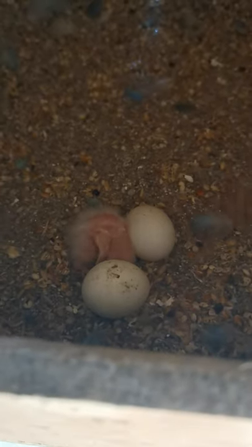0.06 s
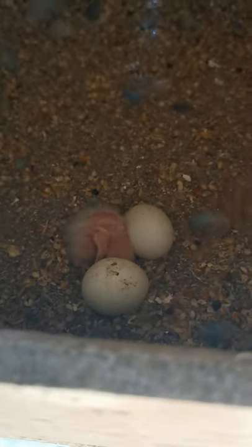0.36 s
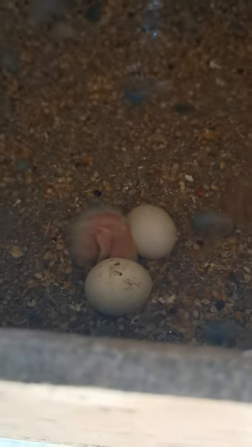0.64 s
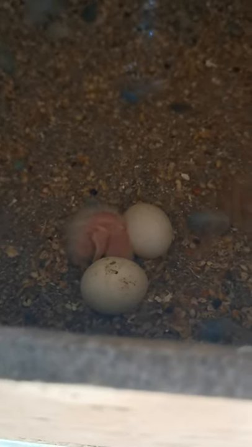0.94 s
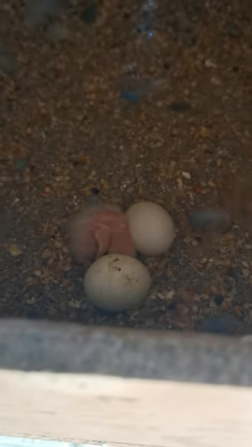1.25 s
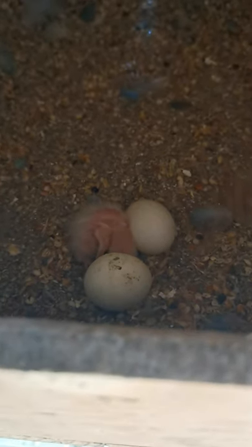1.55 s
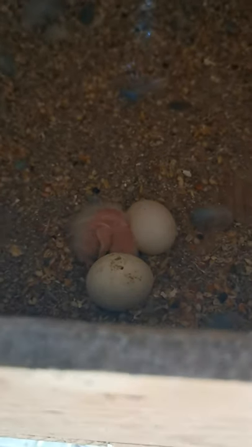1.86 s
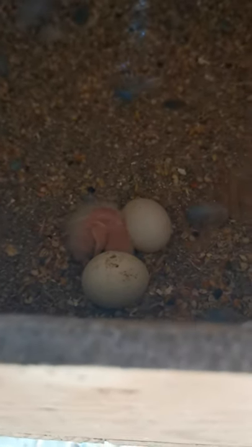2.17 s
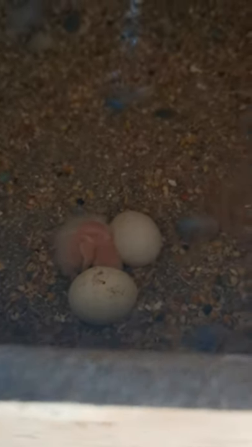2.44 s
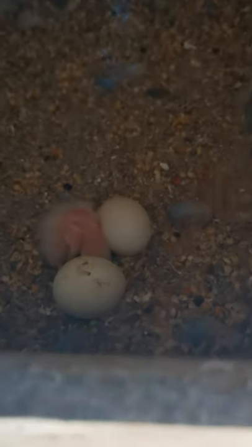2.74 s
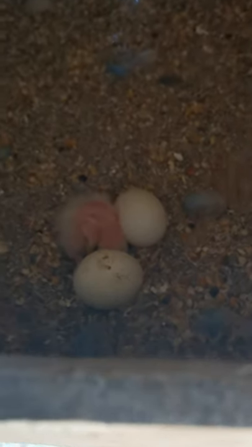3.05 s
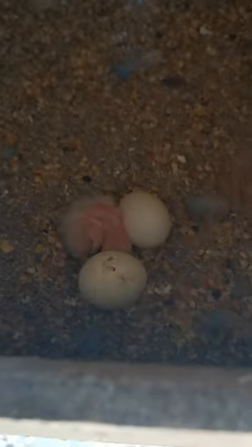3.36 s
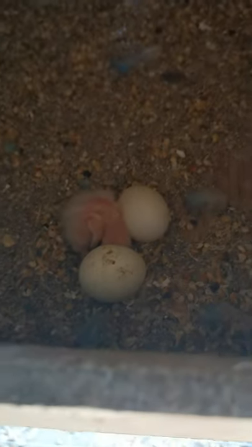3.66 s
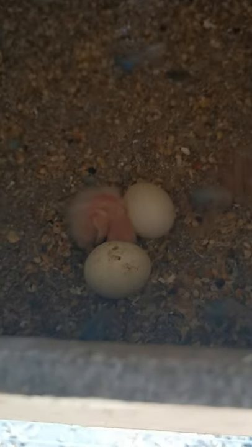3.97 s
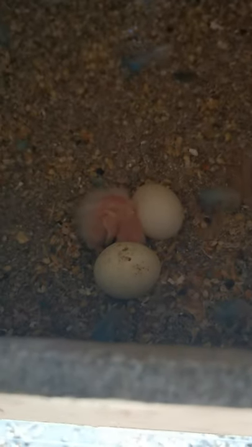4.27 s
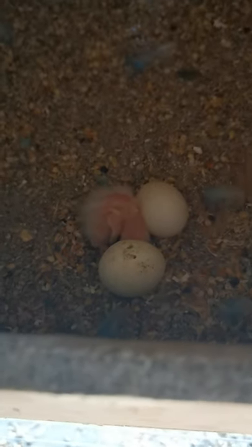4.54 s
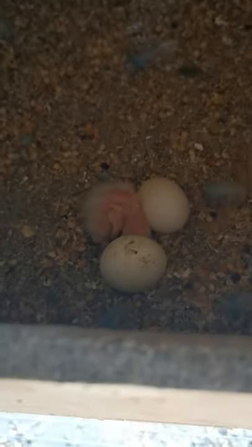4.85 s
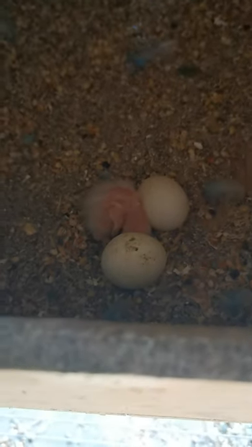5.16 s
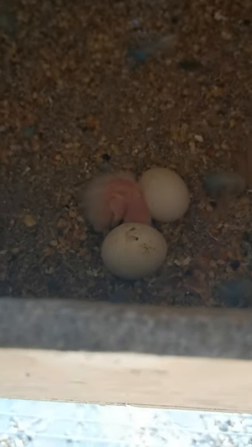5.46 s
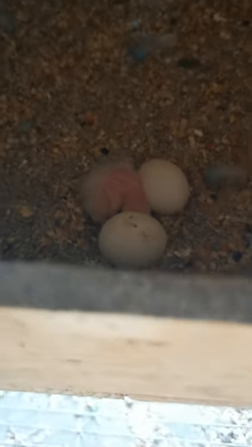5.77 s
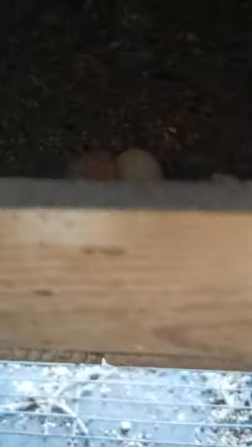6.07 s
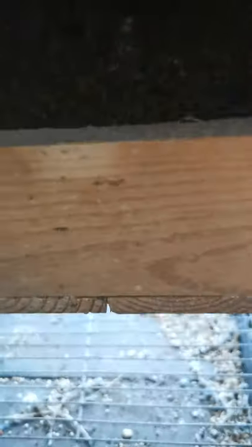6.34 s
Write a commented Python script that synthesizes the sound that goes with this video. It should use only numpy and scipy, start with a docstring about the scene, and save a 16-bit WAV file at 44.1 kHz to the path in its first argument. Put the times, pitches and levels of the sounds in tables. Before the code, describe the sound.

Small parrots chirp and screech harshly close by in a small room, over a faint low rumble.

```python
"""Lovebirds at a nest box

Lovebirds chirp and screech close to a phone held over a wooden nest box in a small room. A chirp
scratches on, holds a harmonic note and leaps to a whistle; a screech is the same voice chopped into
rough pulses. Something taps once on wood, faint low tones come and go, and another bird calls from
further off. A faint rumble comes up in the pauses as the phone's gain recovers."""
import sys
import numpy as np
from scipy import signal
from scipy.fft import rfft, irfft, next_fast_len
from scipy.io import wavfile
from scipy.ndimage import uniform_filter1d, minimum_filter1d

SR = 44100
rng = np.random.default_rng(int(sys.argv[2]) if len(sys.argv) > 2 else 0)


def log_audio(samples):
    """Write samples as a 16-bit WAV file to the path given in sys.argv[1]."""
    # one column per channel
    frames = np.atleast_2d(samples).T
    # limit to full scale, then quantise
    limited = np.clip(frames, -1, 1)
    pcm = np.round(limited * 32767).astype(np.int16)
    wavfile.write(sys.argv[1], SR, pcm)


N = 282681
TIME = np.arange(N) / SR
TOP_HZ = 15600  # upper edge of the phone's passband

# spectrum of turbulent air, shaped by throat and beak: frequency_hz, gain_db
BREATH_SPECTRUM = [(1200, -28), (1750, -19), (2000, -18.5), (2550, -2.5), (3900, -3.5), (5000, -2),
                   (6400, -7), (8200, -16), (10900, -18.5), (12400, -17.5), (13800, -27), (15500, -57)]


def undb(db):
    """Amplitude ratio of a level in decibels."""
    return 10 ** (np.asarray(db) / 20)


def unit(x):
    """Normalisation to an rms of 1."""
    return x / np.sqrt(np.mean(x ** 2) + 1e-18)


def stereo_gains(pan_db):
    """Level-difference panning: two gains, the left pan_db above the right."""
    return undb(np.array([[.5], [-.5]]) * pan_db)


def curves(rows, t):
    """Linear interpolation, at times t, of each column after the time column."""
    times, *columns = np.transpose(rows)
    return [np.interp(t, times, column) for column in columns]


def response(spectrum, hz):
    """Magnitude response, interpolated in decibels over log frequency."""
    frequency_hz, gain_db = np.transpose(spectrum)
    return undb(np.interp(np.log(hz + 1), np.log(frequency_hz), gain_db))


def filtered(x, kind, edge_hz, order=4):
    """Butterworth low-pass or high-pass filtering."""
    return signal.sosfilt(signal.butter(order, edge_hz, kind, fs=SR, output="sos"), x)


def noise(n, spectrum):
    """Spectral shaping of white noise, at an rms of 1."""
    size = max(16384, next_fast_len(n))
    white = rfft(rng.standard_normal(size))
    return unit(irfft(white * response(spectrum, np.fft.rfftfreq(size, 1 / SR)), size)[:n])


def wander(n, rate_hz, size=1024):
    """Random modulation: Gaussian values, rate_hz of them a second, joined by lines."""
    return np.interp(np.arange(n) * rate_hz / SR, np.arange(size), rng.standard_normal(size))


def span(start, end):
    """Sample times of an event, in seconds."""
    return np.arange(int(start * SR), int(end * SR)) / SR


def gate(t, start, end, attack_s, release_s):
    """Trapezoidal envelope whose release is centred on end."""
    return np.clip((t - start) / attack_s, 0, 1) * np.clip((end - t) / release_s + .5, 0, 1)


def add(out, start, sound):
    """Superposition of a stereo sound from a given time."""
    i = int(start * SR)
    out[:, i:i + sound.shape[1]] += sound[:, :max(N - i, 0)]


def background(split_hz=400, air_db=-55, side_db=-7):
    """Partly coherent noise: a swelling rumble to the left and a dull middle band, under faint hiss."""
    # spectra of the hiss and of the rumble: frequency_hz, gain_db
    air_spectrum = [(1000, -8), (1800, -14.5), (3000, -6), (6000, -14), (9000, -13), (15000, -45)]
    rumble_spectrum = [(20, -12.5), (85, -8), (145, -10.5), (190, -7), (229, -3.5), (290, 0), (335, -14),
                       (420, -17), (665, -13.5), (740, -17.5), (800, -11), (905, -18.5), (1500, -24.5),
                       (2500, -28.5), (5000, -109)]
    # slow swell of the rumble: time_s, level_db
    swell = [(0, -42.5), (1.3, -42.5), (2.7, -43.5), (3.2, -38), (3.7, -42.5), (4.4, -44), (6.41, -45)]
    swell_db = curves(swell, TIME)[0]
    out = np.array([noise(N, air_spectrum), noise(N, air_spectrum)]) * undb(air_db)
    for kind, band_db, pan_db in (("low", 0, 4), ("high", -4, 0)):
        mid, side = (unit(filtered(noise(N, rumble_spectrum), kind, split_hz, order=6)) for _ in range(2))
        pair = np.array([mid + undb(side_db) * side, mid - undb(side_db) * side])
        out += pair * undb(swell_db + band_db + 1.3 * wander(N, 14)) * stereo_gains(pan_db)
    return out


def syrinx(hz, roughness, hiss_share, jitter, flutter_db, second_db):
    """Source and filter: throat and beak shape jittering, fluttering harmonics and turbulent air."""
    # response of throat and beak to the voiced sound: frequency_hz, gain_db
    vocal_tract = [(1500, -19), (1950, -16.5), (2450, -9.5), (3300, -3), (4700, 0.5), (5800, -2),
                   (7000, -12), (8200, -19.5), (9400, -17.5), (11800, -17), (13500, -31), (15500, -51)]
    n = len(hz)
    phase = 2 * np.pi * np.cumsum(hz * (1 + jitter * roughness * wander(n, 1500))) / SR
    orders = np.arange(1, 8)[:, None]
    weight = response(vocal_tract, orders * hz) * (orders * hz < TOP_HZ)
    weight *= undb(second_db * (orders == 2))
    weight *= undb(flutter_db * np.array([wander(n, 113) for _ in orders]))
    tone = (weight * np.sin(orders * phase)).sum(0) / np.sqrt((weight ** 2).sum(0) / 2 + 1e-12)
    return np.sqrt(1 - hiss_share) * tone + np.sqrt(hiss_share) * noise(n, BREATH_SPECTRUM)


def grit(n, flare_db=5, flicker_hz=220, count=12):
    """Independent amplitude modulation: each band of the breath flares for a few milliseconds."""
    size = next_fast_len(n)
    spectrum = rfft(noise(size, BREATH_SPECTRUM))
    band_of_bin = np.digitize(np.fft.rfftfreq(size, 1 / SR), np.linspace(1500, 14700, count + 1)) - 1
    bands = (irfft(spectrum * (band_of_bin == k), size)[:n] for k in range(count))
    return unit(sum(band * undb(flare_db * wander(n, flicker_hz)) for band in bands))


def resonance(centre_hz, width_hz):
    """Narrow-band noise: air rings in a resonance whose centre moves."""
    n = len(centre_hz)
    phase = 2 * np.pi * np.cumsum(centre_hz) / SR
    return unit(wander(n, width_hz) * np.sin(phase) + wander(n, width_hz) * np.cos(phase))


def screech(start, end, first_hz, last_hz, pulse_rate_hz, mid_roughness, level_db,
            pulse_s=.0028, release_s=.01296, arch_db=2, pitch_scatter=.067, strength_scatter_db=4):
    """Pulse modulation: uneven bursts of voice, with hiss that fills the gaps and rings the beak."""
    t = span(start, end + release_s / 2)
    n = len(t)
    along = np.linspace(-.5, .5, n)
    hz = np.linspace(first_hz, last_hz, n)
    # through the syllable the pulses quicken and the voice roughens
    rate_hz = pulse_rate_hz * np.exp(.293 * along)
    roughness = np.clip(mid_roughness * np.exp(.8 * along), 0, 1)
    # each pulse has its own length, pitch and strength
    cycle = np.cumsum(rate_hz * np.exp(.19 * wander(n, 119.5))) / SR
    bend, strength = rng.standard_normal(size=(256, 2))[cycle.astype(int)].T
    age = cycle % 1 / rate_hz / pulse_s
    closing = np.minimum(5 * (1 - cycle % 1), 1)
    pulses = age ** 2 * np.exp(2 - 2 * age) * closing * undb(strength_scatter_db * strength)
    pulses /= np.sqrt(uniform_filter1d(pulses ** 2, size=1500) + 1e-6)
    bent_hz = hz * (1 + pitch_scatter * np.sqrt(2 * roughness) * bend)
    tone = syrinx(bent_hz, roughness, hiss_share=.056, jitter=.078, flutter_db=2.5, second_db=7)
    # the beak follows the second harmonic; a weaker resonance flickers above it
    beak = undb(-2) * resonance(2 * hz, width_hz=700)
    upper = undb(-17 + 1.6 * wander(n, 252.5)) * resonance(4.5 * hz, width_hz=1200)
    hiss = unit((grit(n) + beak + upper) * (4.1 + pulses))
    hiss_share = np.minimum(roughness, .9)
    voice = np.sqrt(1 - hiss_share) * tone * pulses + np.sqrt(hiss_share) * hiss
    voice *= undb(level_db - arch_db * (2 * along) ** 2)
    voice *= gate(t, start, end, attack_s=.0044, release_s=release_s)
    return filtered(voice, "high", .97 * min(first_hz, last_hz), order=6)


def wood_tap(gain_db=-14, attack_s=.00045):
    """Modal vibration: one light knock on wood decays as damped sinusoids."""
    # modes of the wood: frequency_hz, level_db, t60_s
    modes = [(415, -4.5, 0.093), (770, -6, 0.041), (1023, 6, 0.033), (1152, -5, .09)]
    t = span(0, .3)
    ring = sum(undb(db - 60 * t / t60) * np.sin(2 * np.pi * hz * t) for hz, db, t60 in modes)
    return undb(gain_db) * ring * (1 - np.exp(-t / attack_s))


def faint_tone(start, end, first_hz, level_db, sink=.069, waver=.036):
    """Random modulation of a soft sinusoid that swells, sinks and fades, stronger on the left."""
    n = len(span(start, end))
    hz = first_hz * np.linspace(1, 1 - sink, n) * (1 + waver * wander(n, 69))
    envelope = np.hanning(n) ** .25 * undb(level_db + 3 * wander(n, 32))
    return np.array([[1.25], [.7]]) * np.sin(2 * np.pi * np.cumsum(hz) / SR) * envelope


def chirp(start, leap, end, held_hz, top_hz, level_db, note_roughness,
          scoop_hz_per_s=10000, swell_db=6, fade_db_per_s=244, creak=.134):
    """Register break: the syrinx scoops up to a wavering note, then cracks into a fading whistle."""
    t = span(start, end + .0066)
    n = len(t)
    # the longer the note, the further below its pitch it starts
    scoop_hz = min(scoop_hz_per_s * (leap - start), 700)
    rise_s = min(.66 * (leap - start), scoop_hz / 19000)
    rise = np.clip((t - start) / rise_s, 0, 1)
    note_hz = held_hz - scoop_hz * (1 - rise) ** 1.3
    # the leap lands between 5870 Hz and the whistle's own pitch, then settles
    since_leap = np.maximum(t - leap, 0)
    whistle_hz = top_hz + .55 * (5870 - top_hz) * np.exp(-since_leap / .013)
    leapt = .5 + .5 * np.tanh((t - leap) / .0025)
    # onset and leap are creaky: the pitch stumbles and the loudness stutters
    scratch = .5 * np.exp(-(t - start) / .0082) + .14 * np.exp(-((t - leap) / .0028) ** 2)
    roughness = np.clip(note_roughness * (1 - .44 * leapt) + scratch, 0, 1)
    hz = note_hz + (whistle_hz - note_hz) * leapt
    hz *= 1 + .0126 * wander(n, 127.8) + creak * roughness ** 2 * wander(n, 333.6)
    stutter_db = (1.85 + 4 * roughness) * np.tanh(wander(n, 333.5))
    db = level_db - swell_db * (1 - rise) ** 2 - .5 * leapt - fade_db_per_s * since_leap
    voice = syrinx(hz, roughness, hiss_share=.3 * roughness ** 2, jitter=.045, flutter_db=3.5, second_db=.5)
    return voice * undb(db + stutter_db) * gate(t, start, end, attack_s=.001, release_s=.032)


def far_call(contour, overtone_db=-17, dull_hz=5200, warble=.0466):
    """Frequency modulation: a slurred, warbling whistle with one overtone, dulled by distance."""
    start, end = contour[0][0], contour[-1][0]
    t = span(start, end + .01)
    hz, db = curves(contour, t)
    phase = 2 * np.pi * np.cumsum(hz * (1 + warble * wander(len(t), 1200))) / SR
    whistle = unit(np.sin(phase) + undb(overtone_db) * np.sin(2 * phase))
    envelope = undb(db) * gate(t, t[0], end, attack_s=.0055, release_s=.012)
    return filtered(whistle * envelope, "low", dull_hz)


def early_reflections(sound, pan_db, echo_db, echo_s=.008, left_lag_s=.00043, count=24):
    """Multipath: sound reaches the right port first; nearby boards add echoes, new for each event."""
    size = SR // 25
    paths = np.zeros((2, size))
    for side, lag_s in enumerate((left_lag_s * (1 + .25 * rng.uniform(-1, 1)), 0)):
        delay_s = lag_s + .0006 + rng.exponential(echo_s, count)
        arrivals = np.minimum(delay_s * SR, size - 1).astype(int)
        paths[side, arrivals] = undb(echo_db) * rng.choice([-1, 1], count) / np.sqrt(count)
        paths[side, int(lag_s * SR)] += 1  # direct path
    paths /= np.sqrt(1 + undb(echo_db) ** 2)
    return unit(stereo_gains(pan_db)) * signal.fftconvolve(sound[None], paths, axes=1)


def room(x, t60_s=.49, treble_t60_s=.31, split_hz=7500, build_s=.007):
    """Reverberation: a diffuse field builds and decays exponentially, the treble sooner."""
    t = span(0, 1)
    scatter = rng.standard_normal((2, SR))
    body = filtered(scatter, "low", split_hz, order=2)
    treble = scatter - body
    tail = body * undb(-60 * t / t60_s) + treble * undb(1 - 60 * t / treble_t60_s)
    tail *= 1 - np.exp(-t / build_s)
    return signal.fftconvolve(x, tail / np.sqrt((tail ** 2).sum() / 2), axes=1)[:, :N]


def gain_control(x, threshold_db=-24, range_db=15.5, recover_db_per_s=42, first_cut_db=5, window=300):
    """Automatic gain control: loud calls push the gain down at once; it creeps back in the pauses."""
    power = uniform_filter1d(np.mean(x ** 2, axis=0), window)
    level_db = 10 * np.log10(np.abs(power) + 1e-12)
    excess_db = np.clip(level_db - threshold_db, 0, range_db)
    recovered_db = recover_db_per_s * TIME
    cut_db = np.maximum.accumulate(np.maximum(excess_db + recovered_db, first_cut_db)) - recovered_db
    gain_db = uniform_filter1d(minimum_filter1d(-cut_db, window), window)
    return x * undb(gain_db)


def scene(near_gain_db=17, far_gain_db=10, tone_gain_db=2, near_room_db=-17.5, far_room_db=-14):
    """Superposition of birds, tap, reverberation and background; table levels precede the gains."""
    # screeched syllables: start_s, end_s, first_pitch_hz, last_pitch_hz, pulse_rate_hz, roughness, level_db
    screeches = [(0.073, 0.163, 2020, 2530, 80, 0.08, -20), (0.161, 0.27, 2600, 2408, 125, 0.45, -19),
                 (0.271, 0.322, 2357, 2110, 120, 0.39, -19), (0.322, 0.426, 1995, 2312, 200, 0.47, -21.5),
                 (.42, 0.511, 2276, 2513, 220, .65, -22), (0.516, 0.577, 2300, 2120, 176, 0.88, -28),
                 (.568, 0.616, 2228, 2220, 165, 0.28, -21.5), (0.618, 0.677, 2190, 2397, 180, 0.1, -29),
                 (0.668, 0.83, 2412, 2312, 136, 0.53, -22.5), (.828, 0.869, 2400, 2450, 177, .25, -21),
                 (0.883, 0.897, 2750, 2764, 180, 0.59, -24.5), (1.04, 1.076, 2305, 2704, 106, 0.6, -25.5),
                 (1.085, 1.132, 2500, 2100, 103, 0.55, -20), (1.132, 1.227, 2126, 2487, 130, .22, -22),
                 (1.227, 1.259, 2150, 2014, 120, 0, -30), (1.26, 1.381, 2580, 2377, 130, 0.54, -22.5),
                 (3.665, 3.733, 2677, 2020, 127, 0.58, -21), (4.164, 4.294, 2570, 2384, 166, 0.77, -23.5),
                 (4.674, 4.814, 2627, 2278, 160, 0.7, -28), (5.147, 5.259, 2756, 2496, 206, 0.5, -26.5),
                 (5.334, 5.424, 2218, 2198, 182, 0.65, -21.5), (5.415, 5.504, 2322, 2515, 135, 0.33, -21),
                 (5.546, 5.604, 2400, 2300, 180, 0.82, -24.5), (5.606, 5.732, 2390, 2427, 115, 0.28, -19.5),
                 (5.732, 5.819, 2148, 2262, 102, 0.15, -18.5), (5.877, 5.932, 1986, 1820, 214, .12, -27.5),
                 (5.926, 6.013, 2395, 1950, 110, 0.28, -27), (6.085, 6.164, 1770, 2495, 73, 0.17, -20.5),
                 (6.161, 6.274, 1620, 2098, 114, 0.44, -21), (6.278, 6.352, 2350, 2370, 154, 0.75, -31),
                 (6.339, 6.431, 2356, 2360, 176, 0.59, -22.5)]
    # faint sinking tones: start_s, end_s, first_pitch_hz, level_db
    tones = [(0.626, .79, 768, -39), (1.18, 1.438, 1120, -40), (1.38, 1.7, 198, -42),
             (1.686, 1.769, 229.4, -36), (1.901, 2.06, 253.6, -39.5), (2.475, 2.621, 700, -44.5),
             (2.658, 2.764, 238.4, -29.5), (2.96, 3.08, 230.4, -29.5), (3.562, 3.684, 237.2, -38.5),
             (4.98, 5.222, 221.3, -39.5)]
    # chirps: start_s, leap_s, end_s, held_pitch_hz, whistle_pitch_hz, level_db, roughness
    chirps = [(.964, 0.985, 0.98, 3030, 6300, -22.5, 0.33), (1.452, 1.48, 1.51, 2376, 5660, -23.5, 0.47),
              (2.032, 2.067, 2.092, 2454, 6060, -21, .6), (2.085, 2.114, 2.15, 2510, 6470, -27.5, 0.23),
              (2.295, 2.325, 2.347, 2470, 6760, -21, .22), (2.6, 2.632, 2.636, 2540, 6430, -19, 0.34),
              (2.709, 2.801, 2.93, 2414, 5630, -26, 0.6), (2.747, 2.801, 2.815, 2355, 7150, -22, 0.12),
              (2.809, 2.846, 2.875, 2427, 5430, -25.5, 0.25), (2.992, 3.026, 3.05, 2352, 6720, -24, 0.53),
              (3.161, 3.195, 3.19, 2394, 5830, -23, 0.47), (3.321, 3.353, 3.4, 2327, 6740, -22.5, 0.37),
              (3.351, 3.37, 3.4, 2388, 6120, -22.5, 0.34), (3.721, 3.781, 3.81, 2406, 6040, -23.5, 0.42),
              (3.876, 3.907, 3.94, 2320, 5400, -20, 0.39), (3.983, 4.021, 4.16, 2424, 6633, -22, 0.14),
              (4.106, 4.165, 4.23, 2390, 5860, -25, 0.33), (4.293, 4.34, 4.49, 2394, 6990, -20, 0.18),
              (4.349, 4.44, 4.468, 2367, 7360, -24, 0.25), (4.493, 4.517, 4.53, 2500, 5980, -26, 0.32),
              (4.547, 4.613, 4.97, 2433, 5970, -23.5, 0.31), (4.6, 4.653, 4.79, 2400, 6940, -20, 0.24),
              (4.893, 4.925, 5, 2460, 5790, -24.5, .3), (4.888, 4.954, 5.23, 2237, 6580, -24, 0.21),
              (5.097, 5.139, 5.28, 2397, 5600, -22, 0.55), (5.211, 5.324, 5.33, 2430, 6960, -20, 0.24),
              (5.498, 5.545, 5.78, 2320, 6270, -22, 0.27)]
    # calls of the far bird, one contour each: time_s, pitch_hz, level_db
    far_contours = [
        [(1.62, 2874, -30.5), (1.662, 3034, -28.5), (1.704, 3304, -33.5), (1.726, 3547, -24.5),
         (1.76, 3510, -38.5)],
        [(3.23, 3150, -32), (3.244, 3170, -18.5), (3.256, 3236, -26), (3.27, 3297, -23), (3.32, 3550, -21)],
    ]
    # where the near birds sit: time_s, left_minus_right_db
    positions = [(0, 2.5), (.45, -6.5), (1.14, 0), (2.07, -4.5), (2.32, -1), (2.6, -5), (3.3, -3.5),
                 (3.94, -5), (4.4, -2), (6.41, -3.5)]
    near, far, behind = np.zeros((2, N)), np.zeros((2, N)), background()
    for row in chirps:
        add(near, row[0], early_reflections(chirp(*row), pan_db=0, echo_db=-3))
    for row in screeches:
        add(near, row[0], early_reflections(screech(*row), pan_db=.5, echo_db=-1.5))
    balance = stereo_gains(curves(positions, TIME)[0])
    near *= undb(near_gain_db) * balance / np.sqrt(np.mean(balance ** 2, axis=0))
    for contour in far_contours:
        add(far, contour[0][0], early_reflections(far_call(contour), pan_db=-6, echo_db=-1))
    far *= undb(far_gain_db)
    add(near, start=.243, sound=early_reflections(wood_tap(), pan_db=-5, echo_db=-1))
    for row in tones:
        add(behind, row[0], undb(tone_gain_db) * faint_tone(*row))
    return near + far + room(undb(near_room_db) * near + undb(far_room_db) * far) + behind


def record(dry):
    """Compression and band limiting: the phone rides its gain and cuts the top."""
    low_pass = signal.ellip(8, .2, 70, TOP_HZ, fs=SR, output="sos")
    return signal.sosfilt(low_pass, gain_control(dry))


dry = scene()
out = record(dry)
log_audio(out)
```